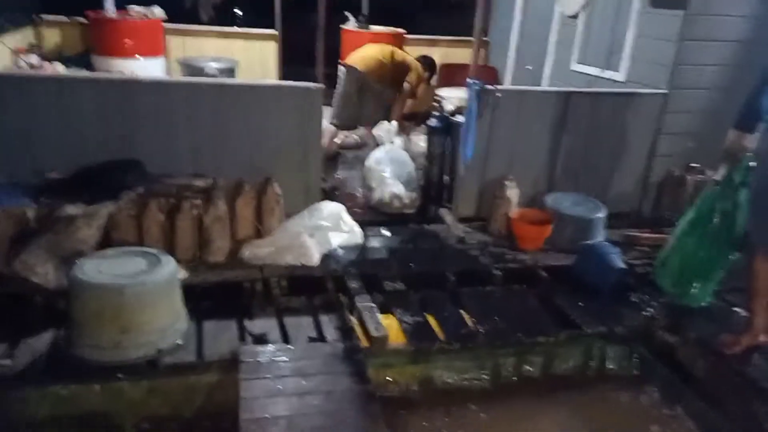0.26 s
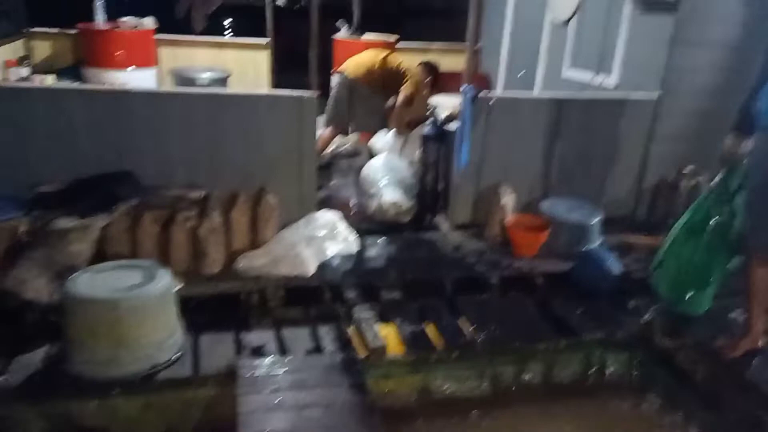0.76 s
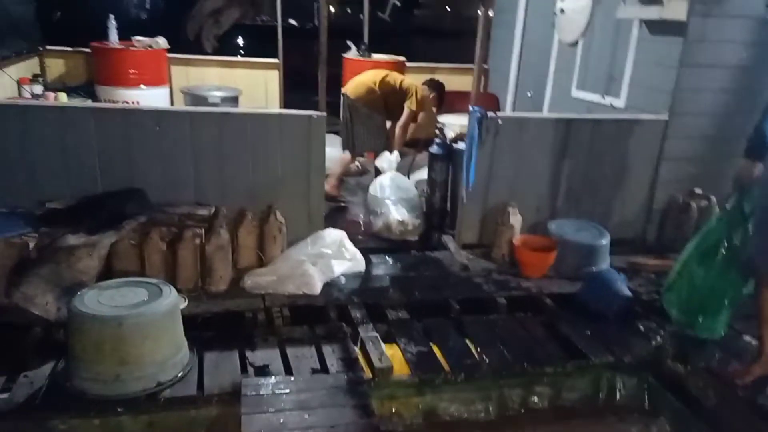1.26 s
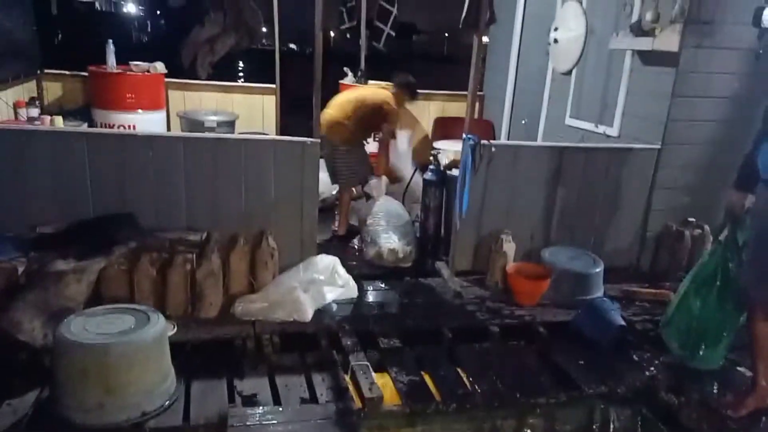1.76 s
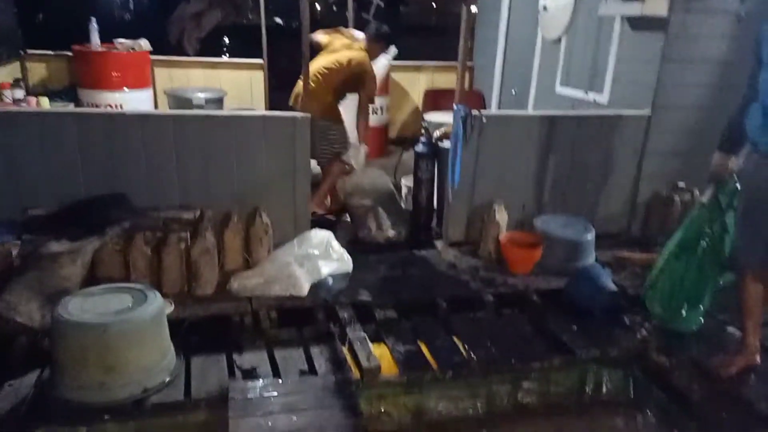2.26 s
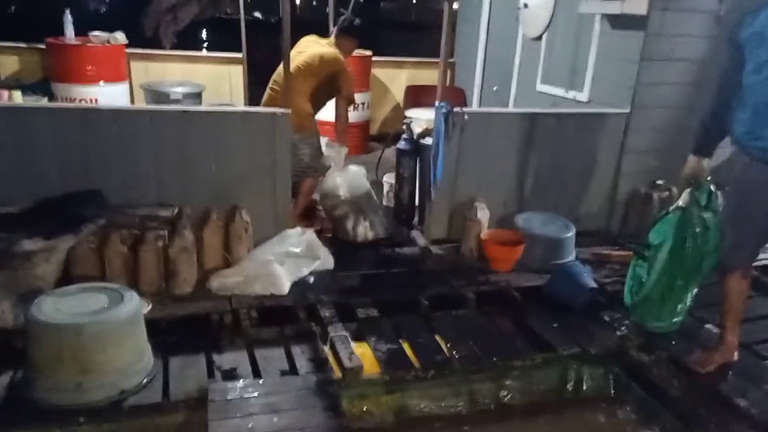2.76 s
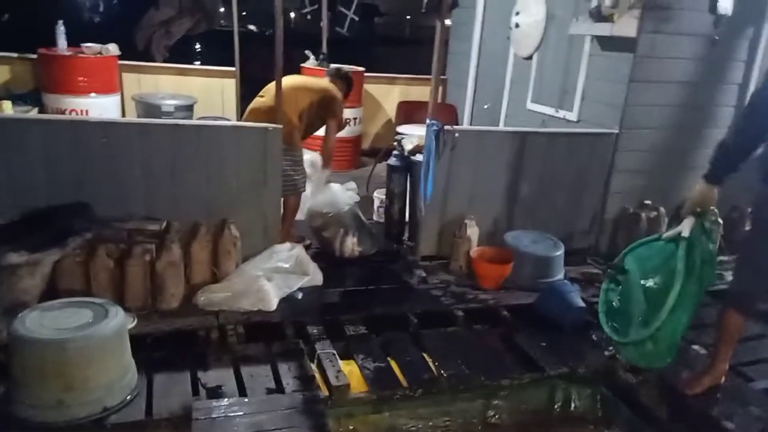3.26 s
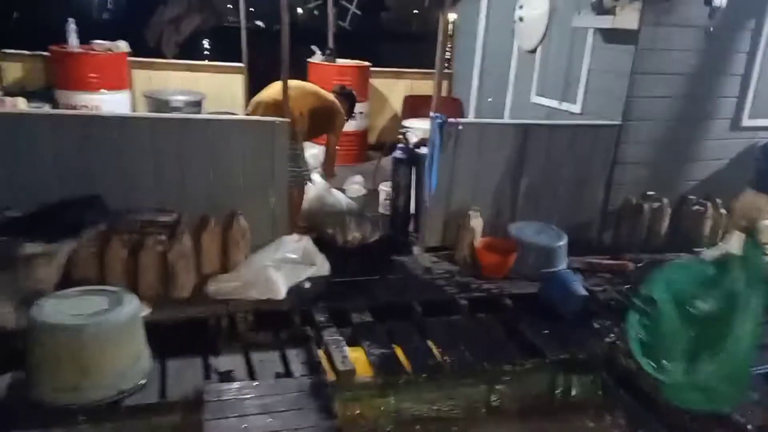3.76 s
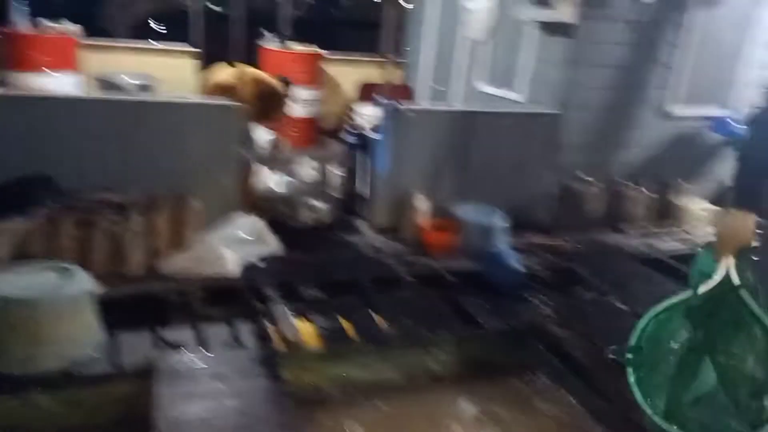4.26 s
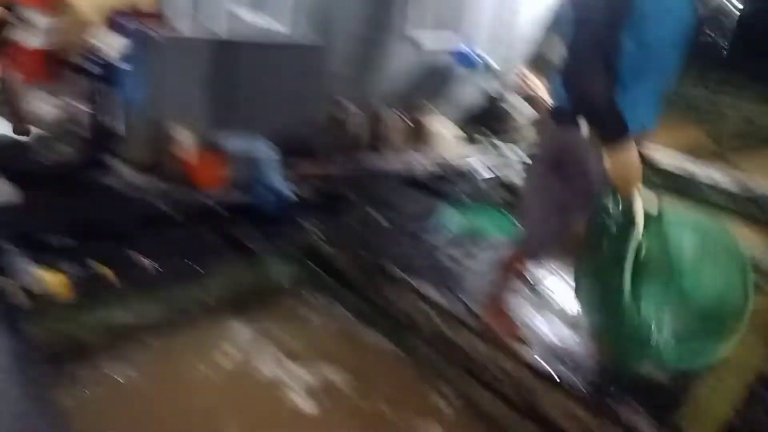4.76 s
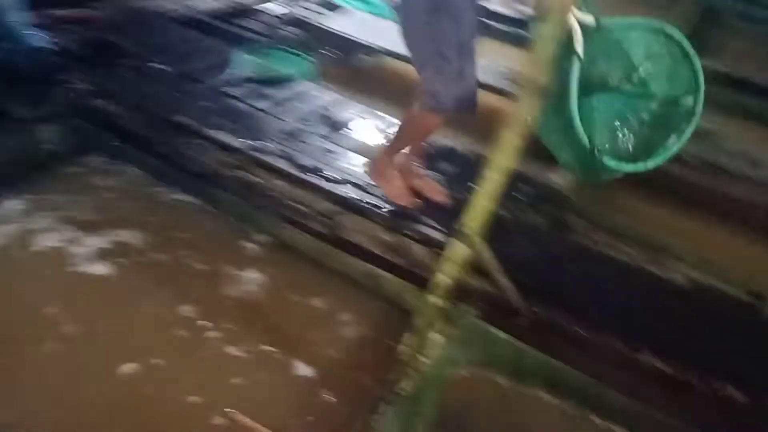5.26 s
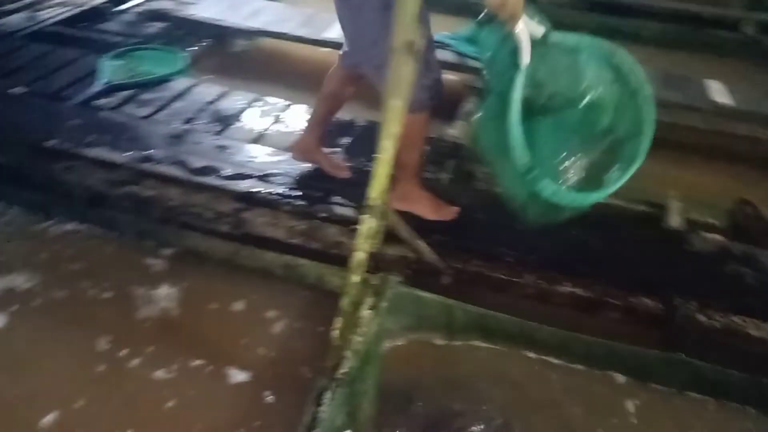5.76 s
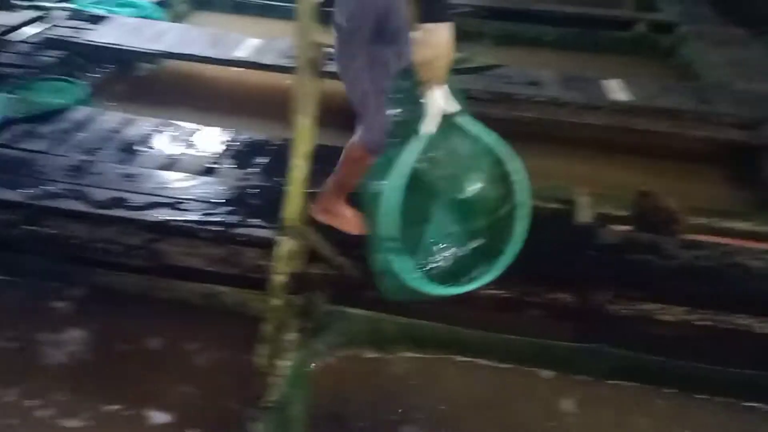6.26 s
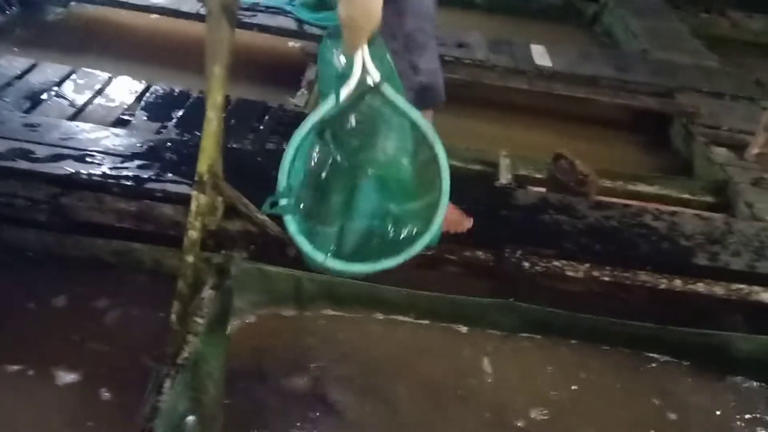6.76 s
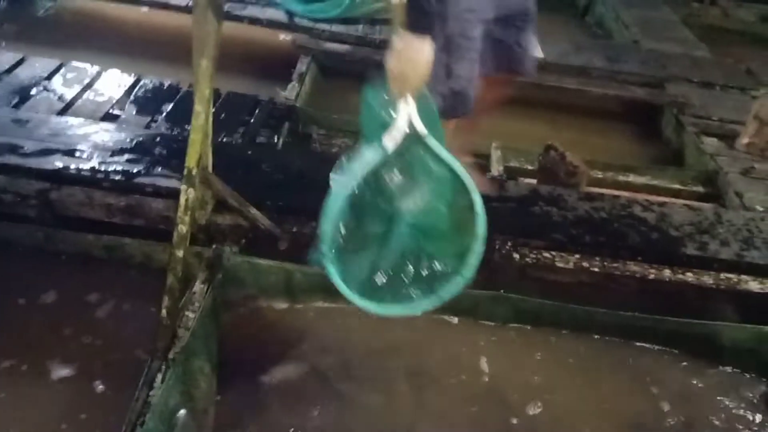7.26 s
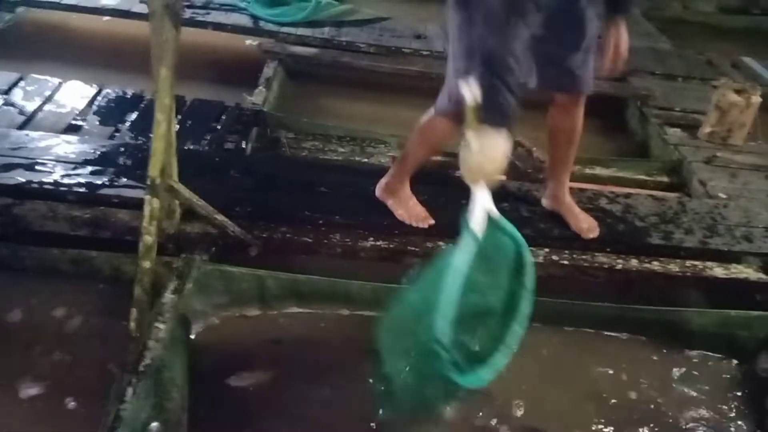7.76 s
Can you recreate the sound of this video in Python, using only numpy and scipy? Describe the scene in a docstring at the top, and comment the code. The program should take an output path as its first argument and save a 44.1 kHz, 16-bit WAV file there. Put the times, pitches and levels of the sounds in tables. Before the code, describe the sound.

Water sloshes, fizzes and drips around a floating plank deck over a low distant generator hum, with one very loud hollow wooden bang midway.

```python
"""Floating fish farm at night

Water sloshes, fizzes and drips in net cages: swarms of ringing bubbles over coloured noise, swelling in surges.
A far generator hums as wavering tones over rumble. Something heavy bangs on the hollow plank deck, close by:
damped modes and noise bursts. Later come steps and knocks as a hand net is carried to the water.
The huts echo drips and deck; the recorder's limiter flattens the bang."""
import sys
import numpy as np
from scipy import signal
from scipy.fft import rfft, irfft, next_fast_len
from scipy.io import wavfile
from scipy.ndimage import uniform_filter1d, minimum_filter1d, map_coordinates

SR = 44100
rng = np.random.default_rng(int(sys.argv[2]) if len(sys.argv) > 2 else 0)


def int16_out(signal):
    """Quantize to a 16-bit WAV file."""
    q = np.round(np.clip(np.atleast_2d(signal).T, -1, 1) * 32767)
    wavfile.write(sys.argv[1], SR, q.astype(np.int16))


N = 353682

LAP_SPLASH_DB, LAP_SLOSH_DB = -65, -62.5  # water between surges, before layer trims


def amp(db):
    """Decibels to gain."""
    return 10 ** (np.asarray(db) / 20)


def unit(x):
    """Scale to rms 1."""
    return x / np.sqrt(np.mean(x ** 2) + 1e-20)


def along(points, hz):
    """Interpolate (Hz, value) points on a log frequency axis."""
    point_hz, value = np.transpose(points)
    return np.interp(np.log(hz + 1), np.log(point_hz + 1), value)


def curves(rows):
    """One value per sample for each column after the time."""
    time_s, *columns = np.transpose(rows)
    return [np.interp(np.arange(N) / SR, time_s, column) for column in columns]


def wobble(rate_hz):
    """A smooth random curve with rate_hz knots a second."""
    knots = rng.standard_normal(int(N * rate_hz / SR) + 4)
    return map_coordinates(knots, [np.arange(N) * rate_hz / SR])


def filtered(x, response):
    """Multiply the spectrum of x by a response of frequency."""
    size = next_fast_len(len(x) + SR // 4)
    spectrum = rfft(x, size) * response(np.fft.rfftfreq(size, 1 / SR))
    return irfft(spectrum, size)[:len(x)]


def coloured(x, spectrum):
    """Filter x by a (Hz, dB) spectrum, at rms 1."""
    return unit(filtered(x, lambda hz: amp(along(spectrum, hz))))


def add(track, start_s, sound):
    """Mix a sound into the track in place."""
    part = track[round(start_s * SR):][:len(sound)]
    part += sound[:len(part)]


def fade(t, t60_s, attack_s):
    """A quick rise and an exponential decay of 60 dB per t60_s."""
    return 1000 ** (-t / t60_s) * (1 - np.exp(-t / attack_s))


def burst(spectrum, t60_s, attack_s):
    """Half a second of dying coloured noise."""
    t = np.arange(SR // 2) / SR
    return coloured(rng.standard_normal(len(t)), spectrum) * fade(t, t60_s, attack_s)


def bubble(t, hz, t60_s, rise):
    """A ringing air bubble; its pitch climbs as it nears the surface."""
    phase_cycles = hz * t * (1 + rise * t / t60_s)
    return np.sin(2 * np.pi * phase_cycles) * fade(t, t60_s, 1 / hz)


def swarm(low_hz, high_hz, cycles, spread_db, count):
    """Bubbles at random moments and pitches, mostly quiet, a few much louder."""
    when, pitch, size = rng.random((count, 3)).T[:, :, None]
    hz = low_hz * (high_hz / low_hz) ** pitch
    t = np.arange(min(int(cycles / low_hz * SR), SR // 16)) / SR
    gain = amp(-spread_db * np.log(size + 0.018))
    rings = gain * bubble(t, hz, cycles / hz, rise=0.17)
    at = (when * N).astype(int) + np.arange(len(t))
    return np.bincount(at.ravel(), rings.ravel(), minlength=N)[:N]


def froth(spectrum, bubbles, noise_db):
    """Bubbles over the rush of those too small to tell apart, at rms 1."""
    rush = coloured(rng.standard_normal(N), spectrum)
    return unit(coloured(bubbles, spectrum) + amp(noise_db) * rush)


def generator():
    """A distant engine: wavering firing tones over a dull, throbbing rumble."""
    # firing tones: pitch_hz, level_db (over the rumble), waver_db
    hum_tones = [(75.8, 6.5, 1.5), (150, -2, 4.0), (162.5, -8, 4), (225.6, -8, 3.0), (406, -16, 6)]
    # rumble spectrum: freq_hz, density_db (per Hz)
    rumble_spectrum = [(25, -13), (42, -12.5), (62, -7), (85, -6), (115, 2), (140, -2.5), (165, -1),
                       (190, -9), (260, -10.5), (320, -13), (420, -13), (600, -24.5), (1200, -57)]
    # rumble level over time: time_s, level_db
    level_points = [(0, -53), (2.9, -54.5), (3.5, -55.5), (4.2, -57), (4.8, -55.5), (5.6, -53), (6.2, -53),
                    (8.0, -54)]
    # running time drifts unevenly, so all tones waver in pitch together
    clock_s = np.arange(N) / SR + np.cumsum(0.00597 * wobble(2.4)) / SR
    tones = np.zeros(N)
    for hz, db, waver_db in hum_tones:
        level = amp(db + waver_db * wobble(11))
        tones += level * np.sin(2 * np.pi * (hz * clock_s + rng.random()))
    level_db, = curves(level_points)
    throb_db = 2.2 * wobble(14)
    rumble = amp(throb_db) * coloured(rng.standard_normal(N), rumble_spectrum)
    return amp(level_db) * (tones + rumble)


def surges():
    """Slosh and splash levels in dB: each surge swells to a crest and drains away over the lapping water."""
    # surges of water: crest_s, rise_s, fall_s, splash_db, slosh_db (over the splash); before layer trims
    surge_rows = [(0.01, 0.022, 0.06, -53.5, 5), (0.15, 0.12, 0.13, -57, 3), (0.36, 0.069, 0.087, -63, 3),
                  (0.73, 0.21, .15, -50, -2), (0.94, .03, 0.048, -53, 1), (1.164, .02, 0.029, -63.5, 13),
                  (1.36, 0.075, 0.16, -50.5, -1.5), (1.615, 0.011, 0.022, -54.5, 3),
                  (1.72, 0.053, 0.16, -55, 7.5), (1.98, 0.17, 0.45, -52, -1.5),
                  (2.225, 0.062, 0.11, -38.5, -1.5), (2.6, 0.02, 0.059, -50, -4),
                  (2.748, 0.0069, 0.088, -53.5, -2), (2.99, 0.24, 0.094, -57, -18),
                  (3.135, 0.016, 0.28, -54.5, -11), (3.52, 0.36, .2, -54.5, 4.5),
                  (3.75, .03, 0.069, -55, 2), (4.08, 0.29, 0.14, -51, 4), (4.37, 0.15, 0.42, -49.5, 0),
                  (4.6, 0.026, 0.14, -47, 5.5), (4.74, 0.07, 0.082, -47.5, 5.5),
                  (5.07, 0.25, 0.15, -50.5, -1), (5.328, 0.033, 0.22, -53, -12),
                  (5.69, 0.23, 0.21, -48.5, -2), (5.92, 0.11, 0.25, -63, 10.5), (6.42, 0.62, 0.89, -47, -3),
                  (6.79, 0.12, 0.16, -48.5, -1), (7.17, 0.033, 0.044, -51, 3), (7.32, 0.088, .08, -52, -5),
                  (7.46, 0.077, 0.093, -48.5, -5), (7.99, 0.099, .12, -43, 1)]
    edge_db, rounding = 9, 1.49  # drop at the ends of rise and fall; 1 = pointed crest, 2 = round
    t = np.arange(N) / SR
    slosh_power = np.full(N, amp(LAP_SLOSH_DB) ** 2)
    splash_power = np.full(N, amp(LAP_SPLASH_DB) ** 2)
    for crest_s, rise_s, fall_s, db, slosh_db in surge_rows:
        near = slice(*np.searchsorted(t, [crest_s - 3 * rise_s, crest_s + 3 * fall_s]))
        away = np.maximum((crest_s - t[near]) / rise_s, (t[near] - crest_s) / fall_s)
        power = amp(db - edge_db * away ** rounding) ** 2
        splash_power[near] += power
        slosh_power[near] += power * amp(slosh_db) ** 2
    return 10 * np.log10(slosh_power), 10 * np.log10(splash_power)


def water(slosh_db, splash_db):
    """Big bubbles gulp and slosh, small ones patter in the splash, the finest fizz as spray."""
    # froth spectra, deepest to finest: freq_hz, density_db (per Hz)
    gulp_spectrum = [(200, -28), (300, -10), (400, 0.5), (520, -0.5), (640, -5.5), (900, -28.5)]
    slosh_spectrum = [(350, -17), (550, -10), (700, -6.5), (850, -3), (1100, -1.5), (1300, -2.5),
                      (1550, -5), (2200, -23.5)]
    splash_spectrum = [(700, -35.5), (1100, -2), (1300, -7), (1600, -4.5), (2100, 3), (2700, 2),
                       (3300, -4.5), (4200, -16), (6000, -23)]
    spray_spectrum = [(2500, -20), (3600, -2.5), (4600, -2.5), (5500, 0.5), (6500, 3), (7500, -0.5),
                      (10000, -5), (15000, -11.5)]
    # level of the deepest water tones: time_s, gulp_db (over the slosh)
    depth_points = [(0, -2), (.4, -2.5), (1.5, -15), (2.8, -11.5), (3.65, -2.5), (4.1, -13.5), (4.7, -10),
                    (6.4, 1), (6.75, -2), (8.0, -2.5)]
    depth_db, = curves(depth_points)
    spray_db = -69 + 0.84 * (splash_db - LAP_SPLASH_DB)  # -69 dB over calm water
    clumps_db = 1.83 * wobble(35)  # water breaks in small uneven lumps

    gulp_bubbles = swarm(308.0, 680, cycles=21, spread_db=4.0, count=500)
    gulp = amp(slosh_db + depth_db - 4) * froth(gulp_spectrum, gulp_bubbles, noise_db=1.5)

    slosh_bubbles = swarm(607.3, 1385, cycles=66, spread_db=4.5, count=900)
    slosh_level = amp(slosh_db - 4 + 0.96 * wobble(25))
    slosh = slosh_level * froth(slosh_spectrum, slosh_bubbles, noise_db=2)

    splash_bubbles = swarm(1083, 3770, cycles=38, spread_db=2.5, count=2200)
    splash_level = amp(splash_db - 0.5 + clumps_db)
    splash = splash_level * froth(splash_spectrum, splash_bubbles, noise_db=4.0)

    spray_bubbles = swarm(3300, 10700, cycles=14, spread_db=4.5, count=2500)
    spray = amp(spray_db + clumps_db) * froth(spray_spectrum, spray_bubbles, noise_db=5)
    return gulp + slosh + splash + spray


def drips(splash_db):
    """Drops tick on the water and trap a bubble, or smack on wet boards; fainter ones follow the splash."""
    # loudest drips, one trapped bubble each: start_s, pitch_hz, level_db (relative)
    drip_rows = [(.195, 2710, -50), (1.064, 3250, -46), (1.152, 508, -50.5), (1.185, 2600, -46),
                 (1.459, 2090, -40), (1.469, 3660, -43), (1.545, 1110, -45), (1.559, 1113, -41.5),
                 (1.591, 3770, -43), (1.610, 2060, -41), (1.660, 1090, -46), (1.694, 1110, -41),
                 (1.760, 1064, -48), (1.855, 3070, -41), (2.11, 2390, -39.5), (2.568, 2740, -44),
                 (2.715, 2570, -40), (3.007, 2460, -42), (3.812, 895, -45), (4.115, 3820, -39),
                 (4.512, 672, -42), (5.306, 1930, -41), (5.337, 2270, -42), (5.399, 1306, -45.5),
                 (5.419, 1910, -43), (5.434, 1190, -48), (5.470, 587, -48), (5.666, 2460, -45),
                 (5.697, 2580, -36.5), (5.734, 1197, -42), (6.790, 653, -45.5)]
    # drops on wet boards: start_s, level_db, pitch_hz
    smack_rows = [(0.911, -49, 2390), (1.0045, -36.5, 6640), (1.335, -38, 2900), (2.0733, -35.5, 2410),
                  (2.745, -38, 2590), (3.2086, -38.5, 6100), (3.5705, -39, 2580), (3.695, -38, 2250),
                  (4.089, -34, 5550), (4.284, -39, 2040), (4.3656, -34, 2490), (4.8644, -32, 2970),
                  (5.369, -38, 2420), (5.6212, -38, 2100), (7.5672, -42.5, 4500)]
    ring_cycles = 78  # cycles to decay 60 dB, so low bubbles ring longer
    out = amp(splash_db - 15.0) * unit(swarm(1096, 4020, cycles=120, spread_db=8.0, count=300))
    t = np.arange(SR // 2) / SR
    for start_s, hz, db in drip_rows:
        tick_spectrum = [(hz / 2, -15), (hz, 0), (hz * 2, -7), (hz * 5, -16)]
        tick = burst(tick_spectrum, t60_s=0.025, attack_s=0.00032)
        ring = bubble(t, hz, ring_cycles / hz, rise=0.06)
        add(out, start_s, amp(db + 4.0) * (ring + amp(-8) * tick))
    for start_s, db, hz in smack_rows:
        smack_spectrum = [(hz / 2, -12), (hz, 0), (hz * 2, -4), (hz * 10, -15)]
        add(out, start_s, amp(db) * burst(smack_spectrum, t60_s=0.023, attack_s=0.00075))
    return out


def deck():
    """Blows crack, ring the hollow deck, rattle loose boards and slap wet wood; bare heels only thump."""
    # blows: start_s, thud_db, slap_db
    blow_rows = [(3.2556, -6, -33), (3.268, -4.5, -29.5), (3.285, -15.5, -35), (3.301, -18.5, -35),
                 (3.887, -38.5, -71), (3.914, -36.5, -55), (4.258, -39, -48), (4.584, -39.5, -38),
                 (6.648, -52, -30), (7.265, -47, -33)]
    # deck resonances: pitch_hz, level_db (relative), t60_s
    deck_modes = [(145.3, -18, 0.3), (255, -9, 0.18), (278, -1, 0.096), (340, -10, 0.13), (407.4, -7, 0.15),
                  (488, -14, .19), (680, -8.5, 0.13), (765, -8.5, 0.2), (872, 2, 0.089), (953, 0.5, 0.046),
                  (966, 0.5, 0.086), (1074, -9, 0.16), (1183, -9, .12), (1390, -15, .11), (2194, -27, 0.11),
                  (2670, -34, 0.3)]
    # loose boards, wet slap, heel thump: freq_hz, density_db (per Hz)
    clatter_spectrum = [(40, -38), (80, -13), (130, -7.5), (280, 0), (480, -3.5), (600, -10.5), (950, 1),
                        (1200, -10), (1600, -16), (2300, -31.5), (3500, -40.5), (12000, -43)]
    slap_spectrum = [(300, -40), (1100, 1), (1600, -4), (2300, 6.5), (3500, -10), (7000, -22), (15000, -19)]
    heel_spectrum = [(50, -13), (130, -1.5), (300, 2.5), (400, -0.5), (540, 0), (800, -22), (1450, -14),
                     (2500, -12), (5000, -59)]
    # bare heels on the boards: start_s, level_db
    step_rows = [(3.58, -42), (3.63, -40.5), (3.74, -43.5), (3.9, -43.5), (7.276, -34.5), (7.451, -33.5)]
    out = np.zeros(N)
    t = np.arange(SR // 2) / SR
    for start_s, thud_db, slap_db in blow_rows:
        ring = np.zeros(len(t))
        for hz, db, t60_s in deck_modes:
            level = amp(db + rng.normal(0, 1))  # each blow excites the modes a little differently
            tone = np.sin(2 * np.pi * (hz * t + rng.random()))
            ring += level * tone * fade(t, t60_s, attack_s=0.00041)
        crack = burst(clatter_spectrum, t60_s=0.036, attack_s=0.00047)
        rattle = burst(clatter_spectrum, t60_s=0.25, attack_s=0.0018)
        slap = burst(slap_spectrum, t60_s=0.09, attack_s=0.0015)
        thud = amp(-9) * ring + amp(-2) * crack + amp(-11.5) * rattle
        add(out, start_s, amp(thud_db) * thud + amp(slap_db) * slap)
    for start_s, db in step_rows:
        add(out, start_s, amp(db) * burst(heel_spectrum, t60_s=0.18, attack_s=0.0012))
    return out


def huts(x):
    """Echo of walls and roof: convolution with noise decaying by band; the bass lingers longest."""
    # decay time: freq_hz, t60_s
    decay_points = [(120, 0.99), (350, 0.55), (900, 0.33), (2500, 0.44), (10000, 0.4)]
    hz, t, noise = signal.stft(rng.standard_normal(SR), SR, nperseg=256)
    decay = amp(-60 * t / along(decay_points, hz)[:, None])
    tail = signal.istft(noise * decay, SR, nperseg=256)[1]
    delay_s = 0.006
    impulse = np.pad(tail / np.linalg.norm(tail), (round(delay_s * SR), 0))
    return signal.fftconvolve(x, impulse)[:N]


def scene():
    """Generator, water, drips and deck, heard from the walkway."""
    slosh_db, splash_db = surges()
    drops = drips(splash_db)
    blows = deck()
    echo = huts(amp(-8) * drops + amp(-10.5) * blows)
    mix = generator() + water(slosh_db, splash_db) + drops + blows + echo
    return mix[None]


def record(dry):
    """A faintly hissing microphone, dull in the top treble, then a fast peak limiter and a band limit."""
    # microphone response: freq_hz, gain_db
    mic_response = [(25, -15.5), (45, -0.5), (70, 1), (7000, 0), (7500, -6.5), (8200, -16), (9500, -22),
                    (11000, -23), (15000, -23)]
    # microphone noise ahead of that response: freq_hz, density_db (per Hz)
    hiss_spectrum = [(1000, 1), (7000, -9), (10000, 19), (15000, 16)]
    ceiling, window_samples, top_hz = 0.72, 160, 15550
    hiss = amp(-68.5) * coloured(rng.standard_normal(N), hiss_spectrum)
    x = filtered(dry[0] + hiss, lambda hz: amp(along(mic_response, hz)))
    needed_gain = ceiling / np.maximum(np.abs(x), ceiling)
    held_gain = minimum_filter1d(needed_gain, size=window_samples)
    gain = uniform_filter1d(held_gain, size=window_samples)
    return filtered(x * gain, lambda hz: hz < top_hz)[None]


dry = scene()
out = record(dry)
int16_out(out)
```